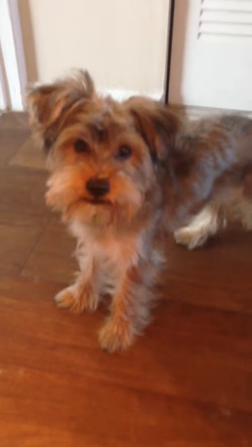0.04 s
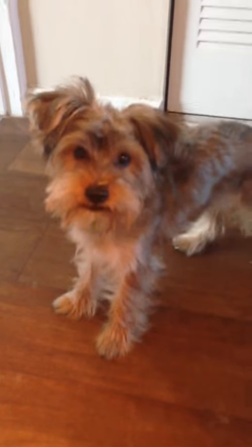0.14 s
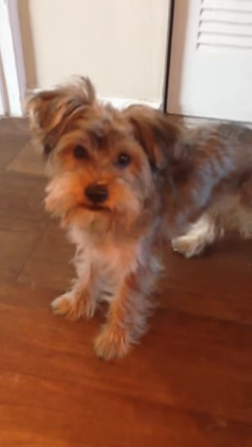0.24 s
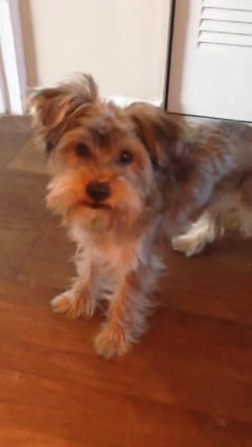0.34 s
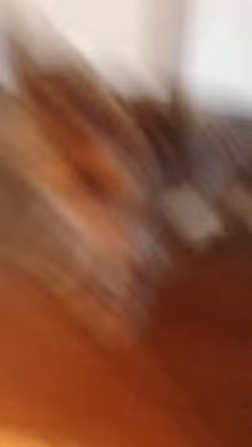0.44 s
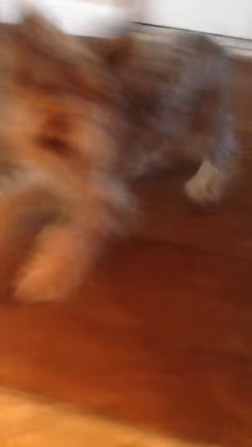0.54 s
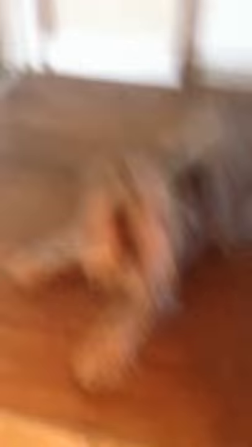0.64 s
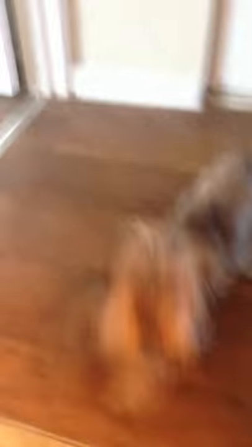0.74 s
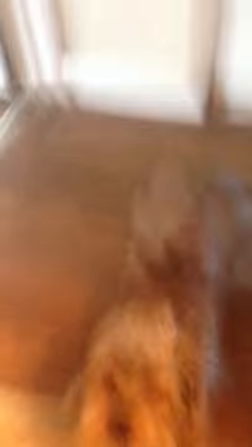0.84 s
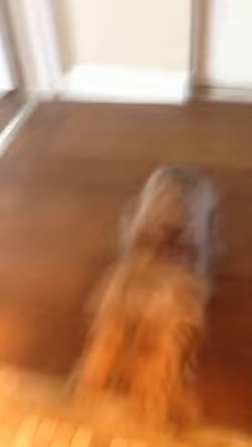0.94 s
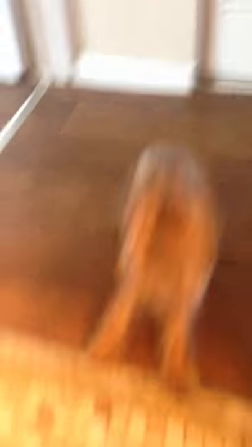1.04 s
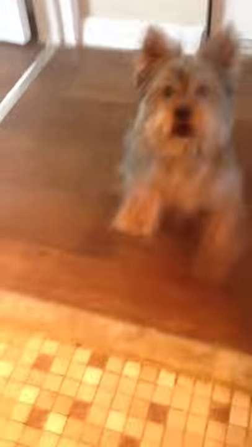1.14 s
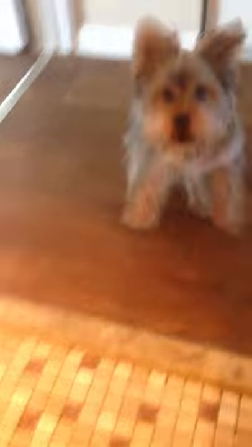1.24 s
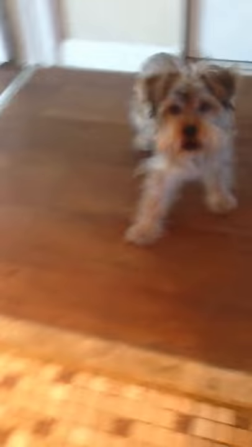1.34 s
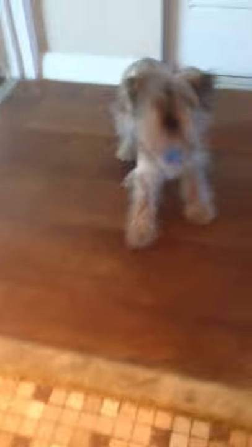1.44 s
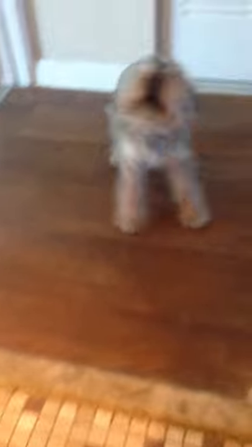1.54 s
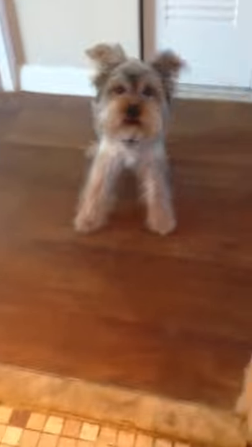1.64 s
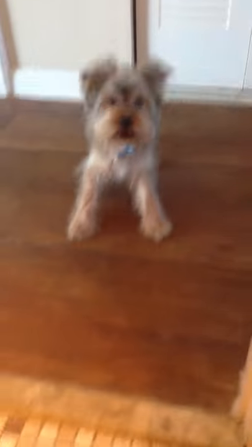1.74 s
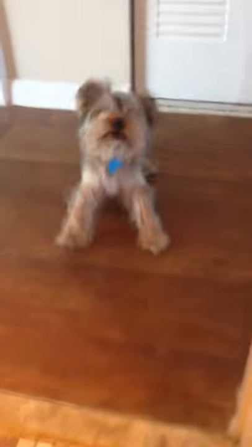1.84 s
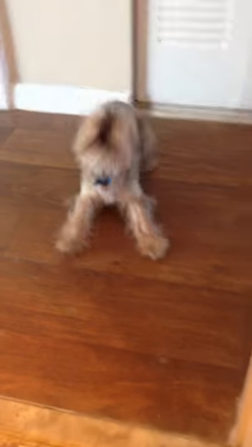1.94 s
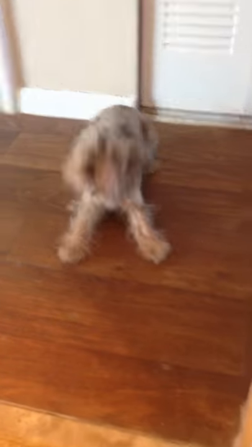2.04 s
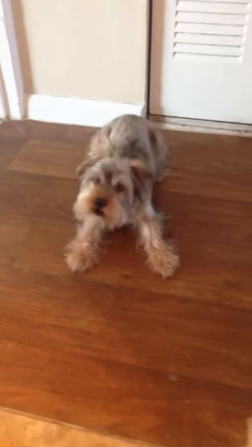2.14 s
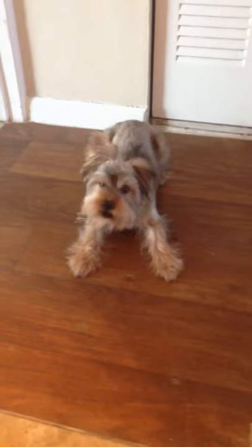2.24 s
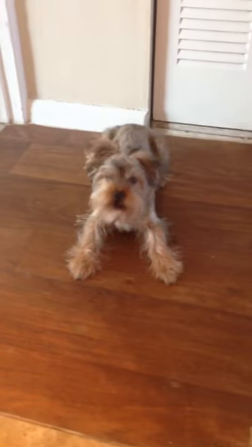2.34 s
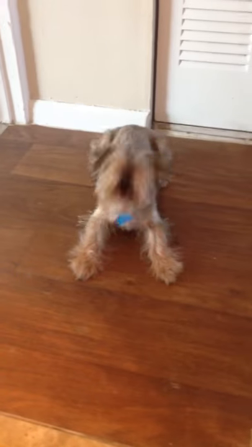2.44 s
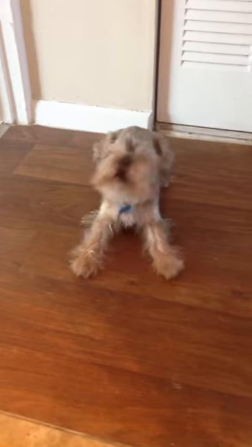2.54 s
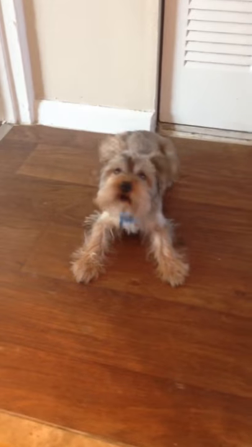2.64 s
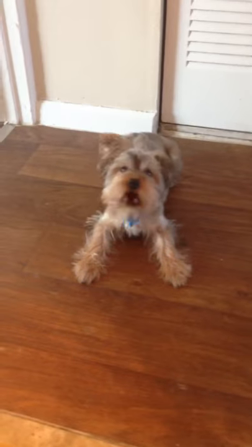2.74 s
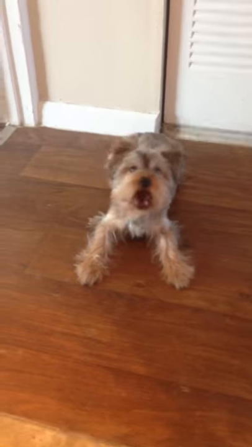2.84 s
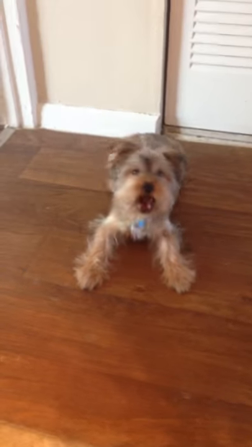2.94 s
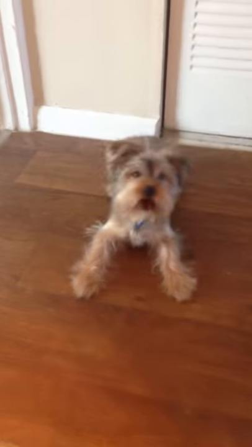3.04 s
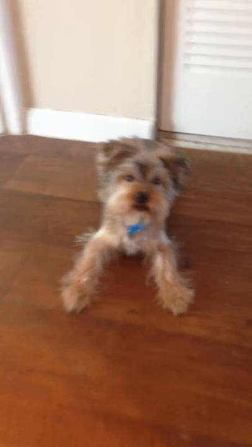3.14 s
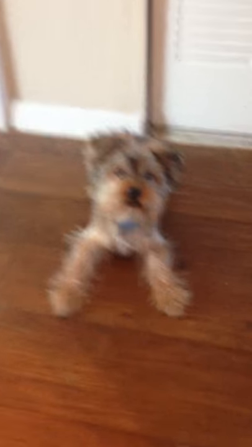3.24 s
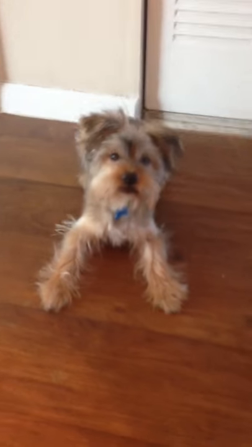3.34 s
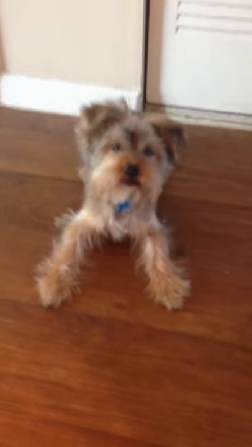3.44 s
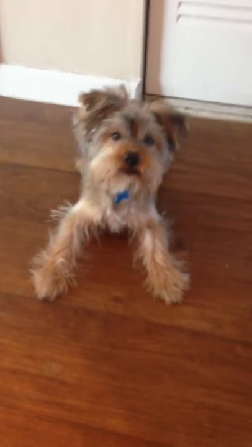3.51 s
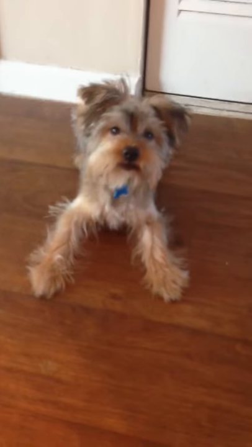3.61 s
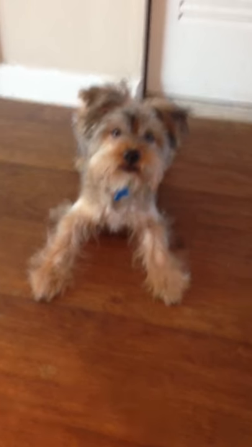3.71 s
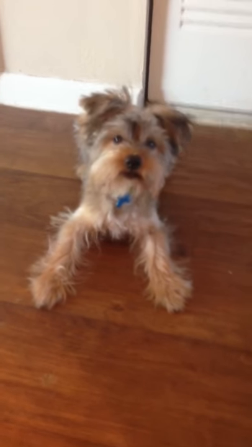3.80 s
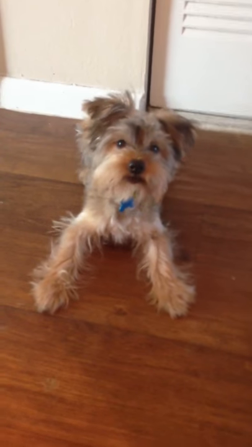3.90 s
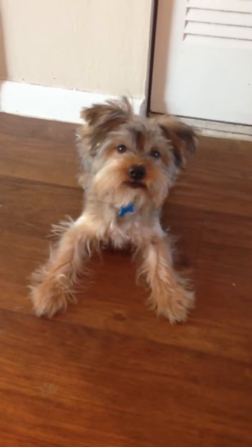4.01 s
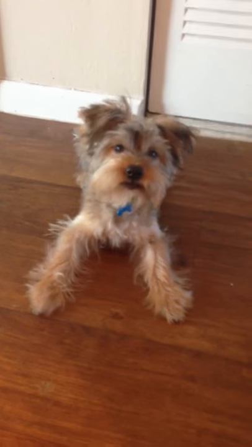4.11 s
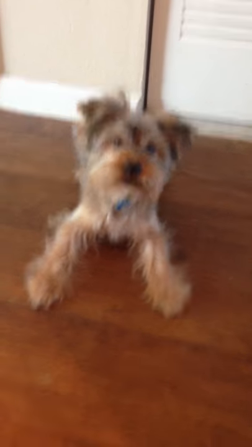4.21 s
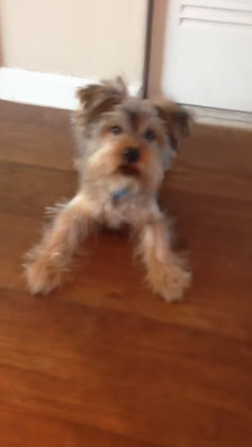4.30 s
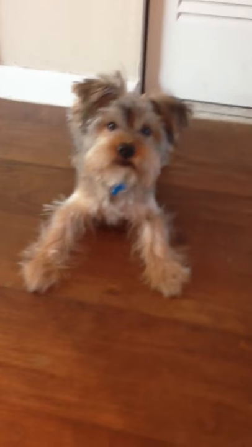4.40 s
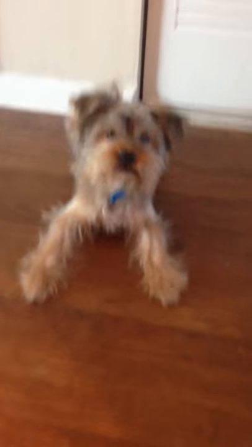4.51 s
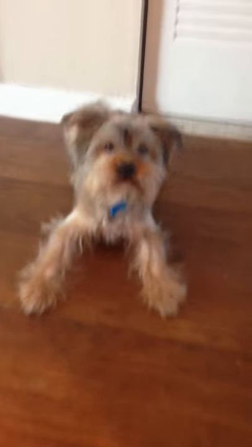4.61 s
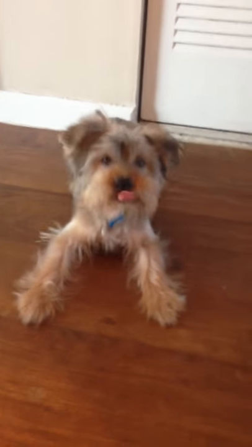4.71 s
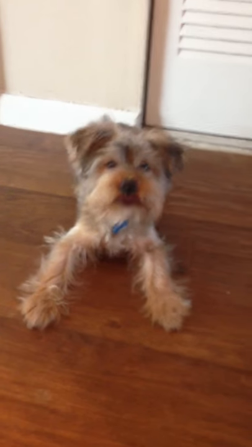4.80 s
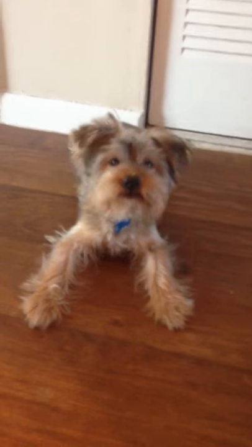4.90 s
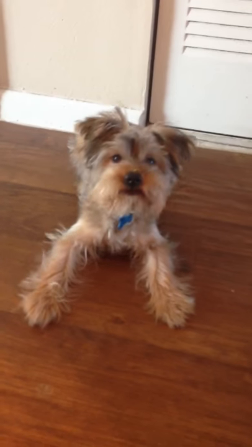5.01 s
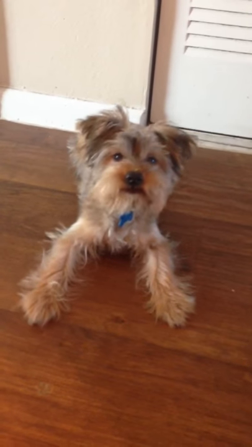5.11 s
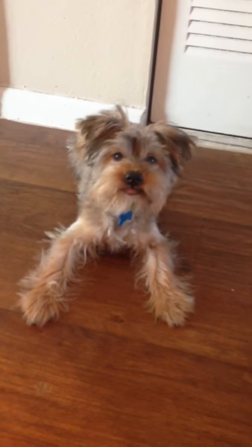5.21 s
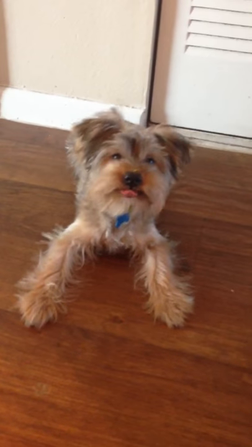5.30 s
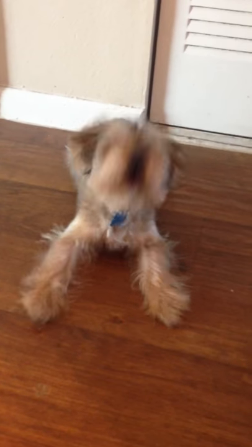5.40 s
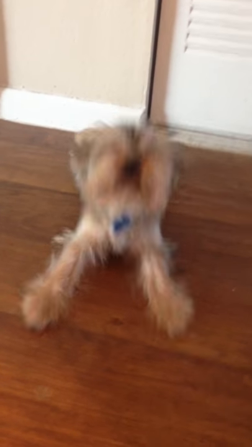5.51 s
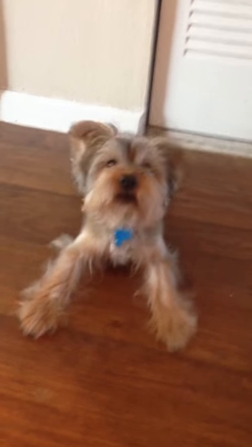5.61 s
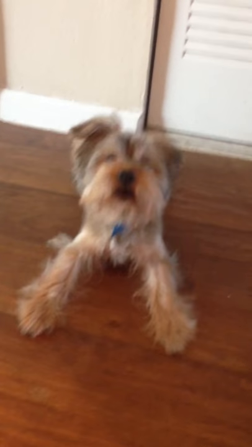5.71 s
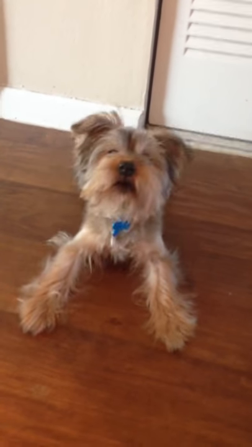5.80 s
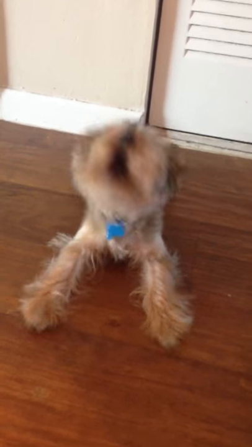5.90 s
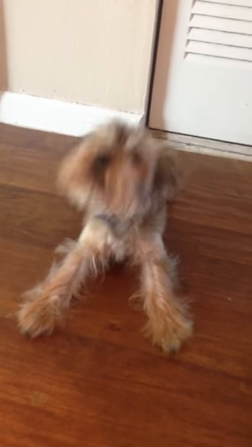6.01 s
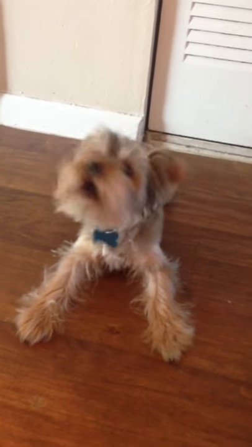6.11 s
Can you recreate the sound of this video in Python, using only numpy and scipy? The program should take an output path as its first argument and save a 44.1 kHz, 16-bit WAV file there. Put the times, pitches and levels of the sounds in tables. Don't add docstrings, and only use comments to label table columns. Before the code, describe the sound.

Sharp, high, rough-edged yaps from a little dog in a bare hard-floored room. A breathy huff leads into a fast pair, three more follow, then nearly three seconds of quiet hold only faint nose whistles, light ticks, soft breaths and room hiss. A small gasp brings the strongest bark and a final one. Close phone microphone, slightly squashed loud peaks, lively short reverberation.

```python
import sys
import numpy as np
from scipy import signal
from scipy.fft import rfft, irfft
from scipy.io import wavfile
from scipy.ndimage import uniform_filter1d, minimum_filter1d

SR = 44100
rng = np.random.default_rng(int(sys.argv[2]) if len(sys.argv) > 2 else 0)


def gain_from_decibels(decibels):
    exponent = np.asarray(decibels, float) / 20
    return 10 ** exponent


def int16_out(signal):
    q = np.round(np.clip(np.atleast_2d(signal).T, -1, 1) * 32767)
    wavfile.write(sys.argv[1], SR, q.astype(np.int16))


N = 271215

# frequency in Hz, level in dB per Hz.
FLOOR_HISS = [(18, -43), (30, -28.5), (161, -3.5), (1250, -15), (4190, -13.5), (13300, -18.5), (14800, -15),
              (16000, -34)]
# start in seconds, end in seconds, start pitch in Hz, end pitch in Hz, level in dB.
WHISTLES = [(.164, .36, 2700, 2790, -86), (.223, .422, 3290, 3170, -81), (.281, .412, 1830, 1750, -79),
            (3.49, 3.699, 3600, 3450, -84.5), (3.491, 3.602, 3230, 3160, -80),
            (3.77, 4.06, 3106, 3050, -81), (3.697, 3.899, 940, 1035, -78), (4.42, 4.63, 1400, 1370, -77),
            (4.15, 4.42, 1350, 1355, -82), (4.42, 4.497, 2770, 2780, -80), (3.2, 3.75, 925, 930, -84),
            (3.22, 3.3, 5166, 5100, -80), (3.85, 4.3, 920, 925, -83)]
# start in seconds, length in seconds, share of it spent rising (0-1), level in dB,
# rush of air in dB against the breath.
PANTS = [(0.544, 0.039, 0.05, -39.5, -6), (0.587, 0.032, 1, -50.5, -1), (1.127, 0.071, 0.3, -54.5, -18),
         (1.334, .11, .5, -67.5, 8.5), (1.776, 0.094, .45, -42.5, -5), (2.811, 0.084, 0.07, -51.5, -17),
         (2.959, 0.036, 0.4, -63, -0.5), (3.089, 0.11, 0.03, -57.5, -22), (3.214, 0.22, 0.08, -69, -11.5),
         (4.305, 0.07, 0.43, -70.5, 4), (4.765, .045, 0.85, -62, 1.5), (4.822, 0.09, 0.05, -69.5, 3)]
GASPS = [
    (1.495, .022, .9, -53, -10.5),
    (5.418, 0.035, 0.62, -52, -8),
]
# frequency in Hz, width in Hz, level in dB.
AIRWAY = [(1120, 550, 0), (2600, 550, -3), (3650, 600, -9), (5200, 500, -17)]
# start in seconds, end
# in seconds, start pitch in Hz, end pitch in Hz, level in dB.
GROWLS = [
    (.546, 0.58, 182, 163, -64),
    (0.754, 0.83, 280, 180, -47),
    (2.136, 2.45, 230, 199, -56),
    (4.418, 4.485, 241, 230, -77),
    (4.788, 4.858, 216, 201.2, -72),
]
# start in seconds, attack in seconds, hold in seconds, release in seconds, effort in dB.
BARKS = [
    (0.617, 0.004, 0.079, .06, -9),
    (0.838, 0.028, 0.096, 0.068, -8.5),
    (1.513, .024, .08, .045, -9),
    (1.952, .045, .055, .075, -7),
    (2.476, .04, .085, .06, -11),
    (5.439, 0.012, 0.049, 0.075, -6),
    (5.921, 0.028, 0.059, 0.091, -10),
]
# strongest overtone in Hz at its top, place of the top (0-1), overtone in Hz at
VOICES = [(1106, .2, 920, .5, 1), (1071.4, 0.2, 720, .55, .6), (1060, .25, 830, 0.6, .75),
          (1100, .25, 710, .5, 0.4), (1285, .35, 960, .58, .65), (1059.3, .2, 1000, 0.57, 0.4),
          (1090, 0.1, 870, 0.6, 0.5)]
# lip resonance in Hz when wide open, palate resonance in Hz, then chest in dB,
# mouth in dB and hiss in dB, all against the effort.
JAWS = [(3250, 1550, -12.5, -7.5, -17.5), (2600, 1350, -15.5, -15, -24), (2880, 1450, -15.5, -14.5, -20.5),
        (2923, 1254, -13.5, -13.5, -23), (2780, 1350, -12, -13.5, -20.5), (2984, 1330, -13.5, -11, -19),
        (2810, 1273, -15.5, -13.5, -21.5)]
# frequency in Hz, width in Hz, level in dB.
CHEST = [(330, 140, -5.5), (713, 440, 3)]
# frequency in Hz, width in Hz, level in dB.
TEETH_HISS = [(4450, 1700, -2.5), (6500, 880, 0.5), (7740, 1000, 3.5), (9600, 1900, -3),
              (10660, 3400, -7.5), (13100, 1500, -4.5)]
# time in seconds,
# peak in dB, ring in Hz, time in seconds for the ring to fall 60 dB, crack in dB against the ring.
TICKS = [(1.12, -48.5, 6500, 0.0038, -1), (1.341, -51, 6800, 0.0037, 5.5),
         (1.376, -60.5, 7090, 0.0072, -8.5), (1.394, -47.5, 8800, 0.0085, 0), (1.464, -55, 3990, 0.042, 0),
         (2.265, -50, 3300, 0.018, -8), (2.295, -51, 3280, 0.019, -24), (2.333, -53.5, 3250, 0.017, -15),
         (2.361, -49, 3170, 0.013, -8), (2.397, -57, 3140, 0.018, -5.5), (3.091, -58.5, 1100, 0.018, -0.5),
         (3.119, -58.5, 1188, .015, -2), (4.05, -64.5, 1608, .01, -2.5), (4.334, -65, 1327, 0.031, -5.5),
         (4.52, -56.5, 703, 0.011, -4.5), (4.58, -49, 3310, 0.006, -10), (4.695, -63, 4236, 0.0092, -8.5),
         (4.761, -46.5, 1845, 0.013, -12), (4.822, -53, 299.7, 0.022, -3.5),
         (4.864, -51.5, 492, 0.0098, -1)]
# time in seconds, peak in dB.
CHINKS = [
    (1.322, -53.5),
    (1.4704, -43),
    (1.8554, -45.5),
    (3.0101, -57.5),
]
# frequency in Hz, level in dB, time in seconds to fall 60 dB.
TAG = [(10400, -12, .05), (11800, -8, .05), (15200, -15, .1), (11200, 0, .008), (8700, -16, .01)]
# frequency in Hz, time in seconds to fall 60 dB.
ROOM = [(150, 0.46), (400, 0.63), (1040, .51), (2200, 0.55), (2900, 0.43), (3600, 0.39), (7280, .46),
        (14000, .07)]
# delay in seconds, level in dB.
ECHOES = [(.0021, -11.5), (.0047, -10.5), (.0083, -14.5), (0.013, -6), (0.0175, -16.5), (.023, -8.5)]


def evened(x):
    return x / np.sqrt(np.mean(x ** 2) + 1e-20)


def read(points, hz):
    f, value = np.transpose(points)
    return np.interp(np.log(hz + 1), np.log(f + 1), value)


def add(mix, s, sound):
    part = mix[round(s * SR):][:len(sound)]
    part += sound[:len(part)]


def resonate(x, hz, width, order=2):
    turn = np.exp(2j * np.pi * np.cumsum(hz * np.ones(len(x))) / SR)
    r = np.exp(-np.pi * width / SR)
    low = x / turn
    for _ in range(order):
        low = signal.lfilter([1 - r], [1, -r], low)
    return 2 * (turn * low).real


def modes(x, table, factor=1, order=2):
    total = 0
    for k, (hz, width, db) in enumerate(table):
        total = total + (-1) ** k * gain_from_decibels(db) * resonate(x, hz * factor, width, order)
    return evened(total)


def floor_hiss():
    spectrum = rfft(rng.standard_normal(N))
    hz = np.fft.rfftfreq(N, 1 / SR)
    return gain_from_decibels(-68.5) * evened(irfft(spectrum * gain_from_decibels(read(FLOOR_HISS, hz)), N))


def whistle(start, end, start_hz, end_hz, level_db):
    air = rng.standard_normal(round((end - start) * SR))
    tone = resonate(air, np.linspace(start_hz, end_hz, len(air)), 42)
    tone = tone * gain_from_decibels(2.5 * evened(uniform_filter1d(air, size=1500)))
    return start, gain_from_decibels(level_db) * evened(tone) * signal.windows.tukey(len(air), .4)


def pant(s, length, rise, level_db, hiss_db, mouth=1):
    t = np.arange(0, length, 1 / SR)
    air, rush, flutter = rng.standard_normal((3, len(t)))
    shape = np.interp(t / length, [0, np.clip(rise, .02, .95), 1], [0, 1, 0]) ** 1.5
    dullness = np.clip(.8 - .06 * hiss_db, 0, .95)
    rush = evened(signal.lfilter([1], [1, -dullness], rush))
    breath = modes(air, AIRWAY, mouth) + gain_from_decibels(hiss_db) * rush
    flutter_db = 0.83 * evened(uniform_filter1d(flutter, 200))
    return s, gain_from_decibels(level_db + flutter_db) * shape * breath


def gasp(*row):
    return pant(*row, mouth=0.48)


def growl(start, end, start_hz, end_hz, level_db):
    air = rng.standard_normal(round((end - start) * SR))
    puffs = .4 + np.exp(-(np.arange(len(air)) * 30.5 / SR % 1) / .3)
    body = resonate(puffs * air, np.linspace(start_hz, end_hz, len(air)), 87)
    return start, gain_from_decibels(level_db) * evened(body) * signal.windows.tukey(len(air), .4)


def patchy_hiss(air, factor):
    total = 0
    for hz, width, db in TEETH_HISS:
        drift = uniform_filter1d(rng.standard_normal(len(air)), size=900)
        total = total + gain_from_decibels(db + 5.4 * evened(drift)) * resonate(air, hz * factor, width)
    return evened(total)


def fold_slaps(done, top_hz, top_at, end_hz, rough):
    places = [0, top_at, (1 + top_at) / 2, 1]
    halfway_hz = top_hz - .4 * (top_hz - end_hz)
    tone_hz = uniform_filter1d(np.interp(done, places, [915, top_hz, halfway_hz, end_hz]), 600)
    wobble = evened(uniform_filter1d(rng.standard_normal(len(done)), 120))
    turns = np.cumsum(tone_hz / 2 * (1 + .3 * rough ** 2 * wobble)) / SR
    slaps = .45 * np.cos(2 * np.pi * turns)
    for k in range(2, 9):
        slaps = slaps + np.cos(2 * np.pi * k * turns)
    slaps = slaps * (1 + .55 * np.cos(2 * np.pi * turns / 3))
    return tone_hz, turns, slaps


def bark(timing, voice, jaws):
    start, attack, hold, release, effort_db = timing
    top_hz, top_at, end_hz, rough_start, shut_at = voice
    open_hz, palate_hz, chest_db, mouth_db, hiss_db = jaws
    t = np.arange(0, attack + hold + release, 1 / SR)
    done = np.linspace(0, 1, len(t))
    shimmer, air, teeth = rng.standard_normal((3, len(t)))

    swell_db = 1.315 * 20 * np.log10(np.clip(t / attack, .03, 1))
    dip_db = swell_db - 15.5 * np.maximum(t - attack - hold, 0) / release
    rough = np.clip(np.interp(done, [0, .3, .6], [rough_start, rough_start, .91]), 0, .98)
    tone_hz, turns, slaps = fold_slaps(done, top_hz, top_at, end_hz, rough)
    bursts = gain_from_decibels(4.2 * rough * evened(uniform_filter1d(shimmer, 110)))
    puffs = (.5 + np.exp(-(turns % 1) / 0.5)) * air
    drive = bursts * (np.sqrt(1 - rough ** 2) * evened(slaps) + rough * evened(puffs))

    throat = evened(resonate(drive, 0.94 * tone_hz, 272))
    palate_level_db = -4 - 12 * np.maximum(1 - done / 0.4, 0)
    throat -= gain_from_decibels(palate_level_db) * evened(resonate(drive, palate_hz, 350))

    chest = modes(drive, CHEST, 1.02 - 0.16 * done)
    chest += 0.84 * (1 - done) ** 2 * bursts * np.cos(4 * np.pi * turns / 3)

    mouth_hz = 1937
    lips_hz = np.interp(done, [.12, shut_at], [open_hz, 2160])
    cavity = resonate(drive, mouth_hz * (1.03 - 0.1 * done), 580, order=3)
    lips = gain_from_decibels(2.5 - 6 * done) * resonate(drive, lips_hz, 675, order=3)
    tongue = gain_from_decibels(-1.5 - 9 * done) * resonate(drive, (mouth_hz + lips_hz) / 2.1, 500)
    mouth = evened(cavity - lips + tongue)

    closing = 1.04 - 0.12 * done
    hiss = patchy_hiss(bursts ** 0.57 * teeth, closing)
    hiss = (1 - .7 * done) * hiss + 0.45 * done * resonate(hiss, 7000 * closing, 4200, order=1)
    puff_db = -10.5 - 250 * (done - .7) ** 2
    hiss += gain_from_decibels(puff_db) * evened(resonate(teeth, 4330 * closing, 500))

    sound = evened(throat)
    sound = sound + gain_from_decibels(chest_db - 0.41 * dip_db) * chest
    sound = sound + gain_from_decibels(mouth_db - .3 * dip_db) * mouth
    sound = sound + gain_from_decibels(hiss_db - 12 * done - 0.11 * dip_db) * hiss
    edges = np.clip(np.minimum(t / .002, (t[-1] - t) / 0.0022), 0, 1)
    return start, gain_from_decibels(effort_db + dip_db) * sound * edges


def tick(s, peak_db, hz, t60, crack_db):
    t = np.arange(2500) / SR
    ring = np.sin(2 * np.pi * hz * t) + gain_from_decibels(-10) * np.sin(2 * np.pi * 1.45 * hz * t)
    crack = rng.standard_normal(len(t)) * gain_from_decibels(crack_db - 60 * t / 0.012)
    return s, gain_from_decibels(peak_db) * (ring * gain_from_decibels(-60 * t / t60) + crack)


def chink(s, peak_db):
    t = np.arange(6000) / SR
    sound = np.zeros(len(t))
    for hz, db, t60 in TAG:
        spot_db = 2.5 * rng.standard_normal()
        sound += gain_from_decibels(peak_db - 2.0 + db + spot_db - 60 * t / t60) * np.sin(2 * np.pi * hz * t)
    return s, sound


def room(x):
    taps = np.zeros(SR)
    at = np.arange(500, SR - 20, 20)
    taps[at + rng.integers(0, 20, len(at))] = rng.choice([-1., 1.], len(at))
    hz, t, z = signal.stft(taps, SR, nperseg=256)
    dying = gain_from_decibels(-60 * t / read(ROOM, hz)[:, None])
    tail = signal.istft(z * dying, SR, nperseg=256)[1]
    tail = gain_from_decibels(-13.0) * tail / np.linalg.norm(tail)
    add(tail, 0.00049, gain_from_decibels([0.0019]))
    for s, db in ECHOES:
        add(tail, s, gain_from_decibels([db]))
    return signal.fftconvolve(x, tail)[:N]


def scene():
    dog = np.zeros(N)
    for timing, voice, jaws in zip(BARKS, VOICES, JAWS):
        add(dog, *bark(timing, voice, jaws))
    sources = ((whistle, WHISTLES), (pant, PANTS), (gasp, GASPS), (growl, GROWLS), (tick, TICKS), (chink, CHINKS))
    for source, table in sources:
        for row in table:
            add(dog, *source(*row))
    return (room(dog) + floor_hiss())[None]


def band_limit(x):
    return signal.sosfilt(signal.butter(12, 16300, fs=SR, output="sos"), x)


def record(dry):
    order = 6
    thin = signal.sosfilt(signal.butter(order, 125, "high", fs=SR, output="sos"), dry)

    power_db = 10 * np.log10(abs(uniform_filter1d(thin[0] ** 2, 400)) + 1e-12)
    fall = np.arange(N) * 14.0 / SR
    held_db = np.maximum.accumulate(power_db + fall) - fall
    over_db = np.maximum(held_db + 11.0, 0)
    ducked = thin / gain_from_decibels(0.64 * uniform_filter1d(over_db, 200))

    room_left = np.minimum(.7 / (abs(ducked[0]) + 1e-9), 1)
    limiter = uniform_filter1d(minimum_filter1d(room_left, size=161), size=81)
    limited = ducked * limiter

    top = signal.sosfilt(signal.butter(order, [15300, 16050], "band", fs=SR, output="sos"), limited)
    below = signal.sosfilt(signal.butter(2 * order, 15300, fs=SR, output="sos"), limited)
    return band_limit(below + gain_from_decibels(-10) * top)


dry = scene()
out = record(dry)
int16_out(out)
```